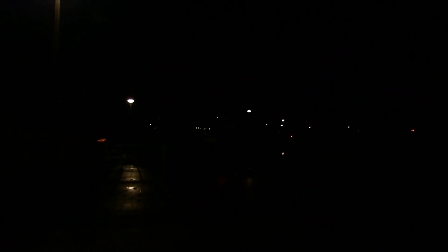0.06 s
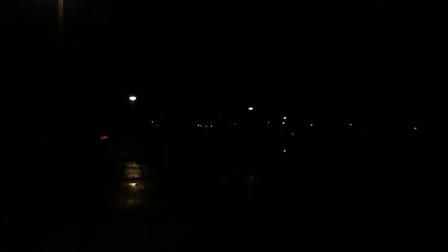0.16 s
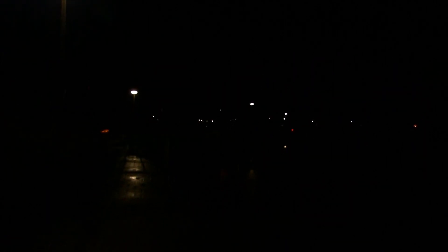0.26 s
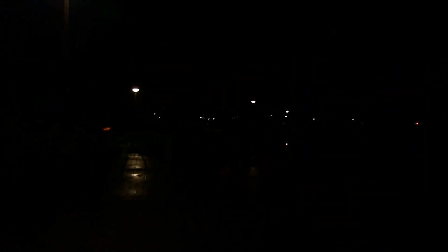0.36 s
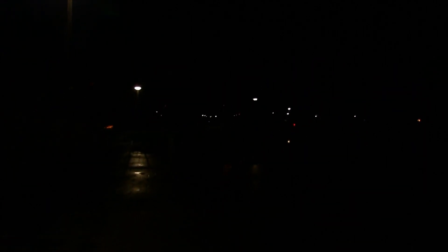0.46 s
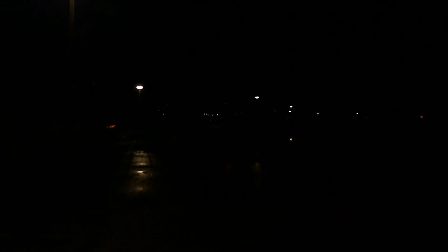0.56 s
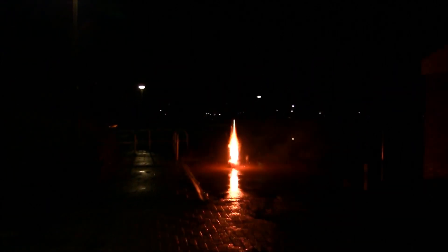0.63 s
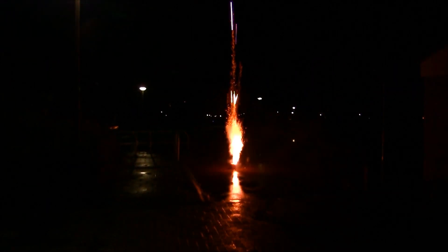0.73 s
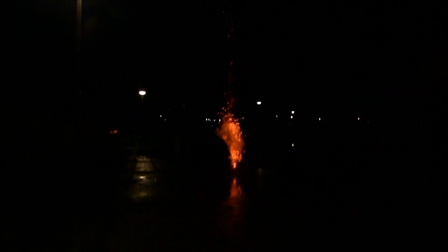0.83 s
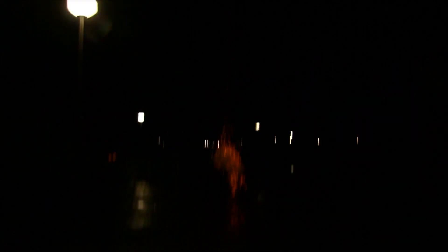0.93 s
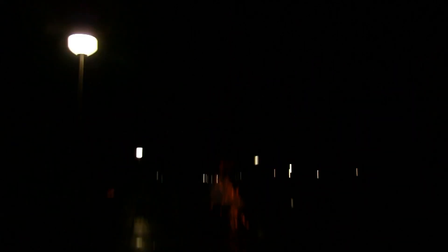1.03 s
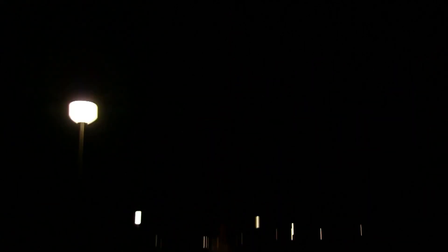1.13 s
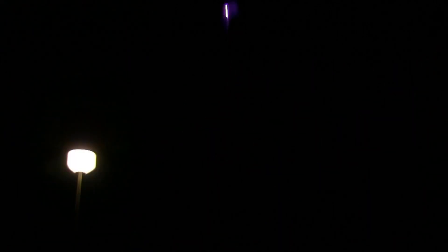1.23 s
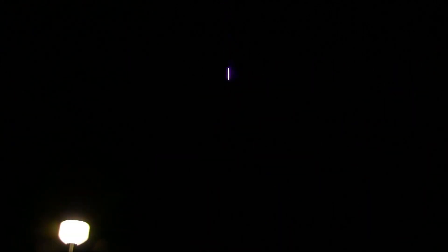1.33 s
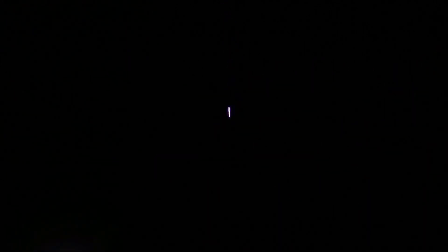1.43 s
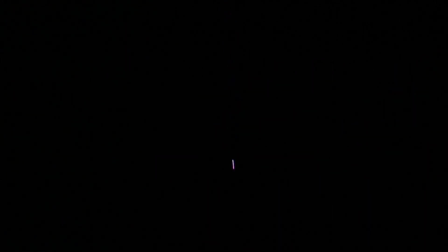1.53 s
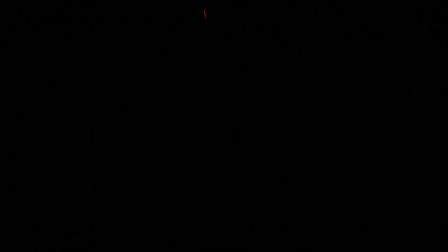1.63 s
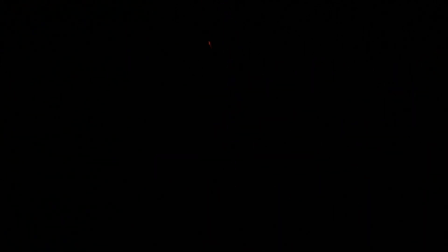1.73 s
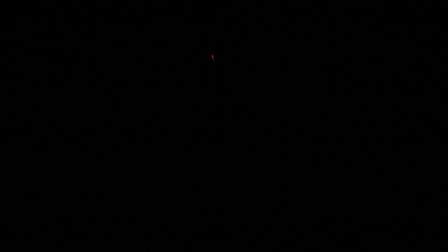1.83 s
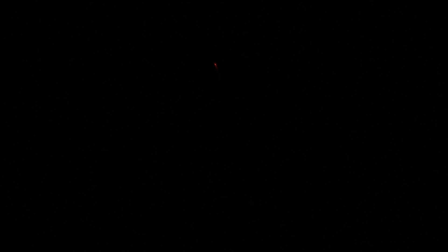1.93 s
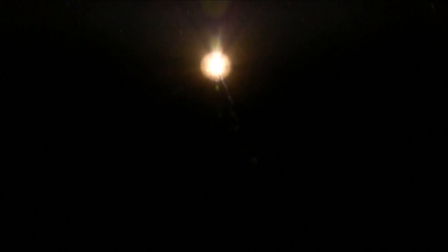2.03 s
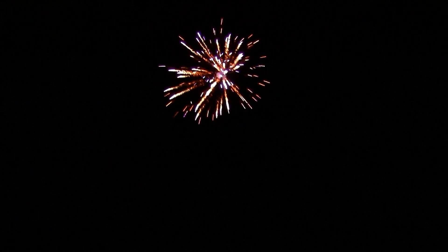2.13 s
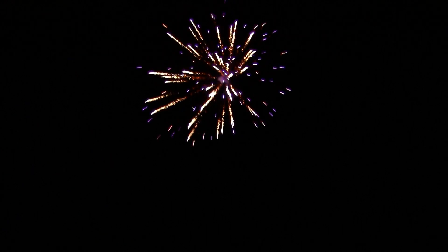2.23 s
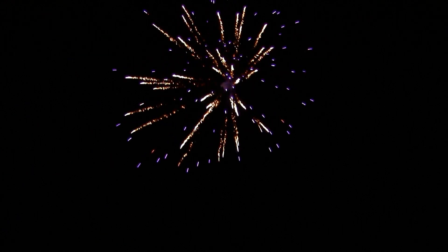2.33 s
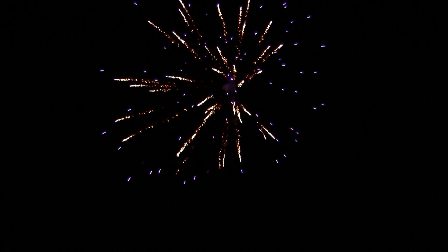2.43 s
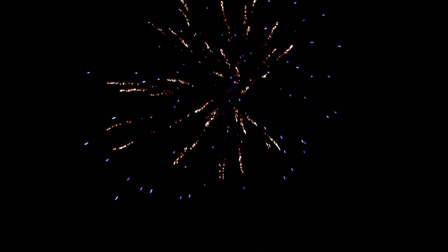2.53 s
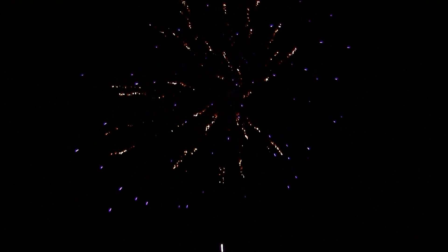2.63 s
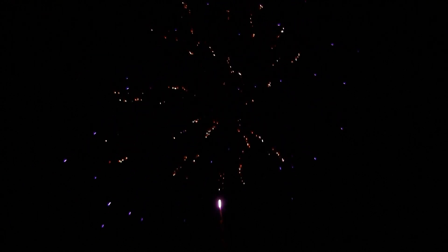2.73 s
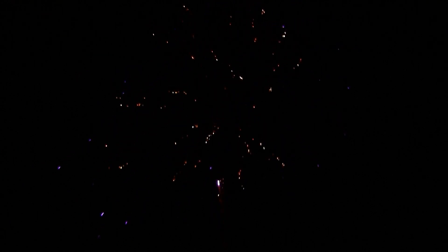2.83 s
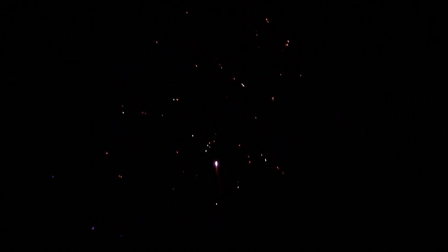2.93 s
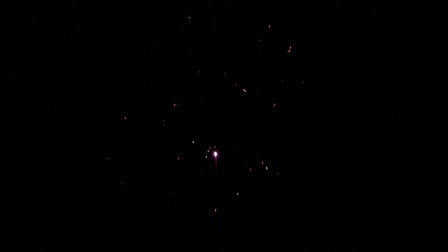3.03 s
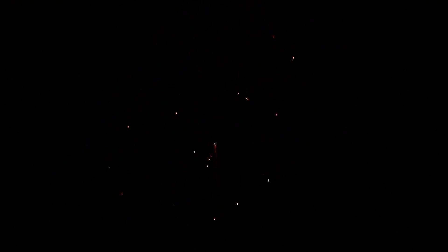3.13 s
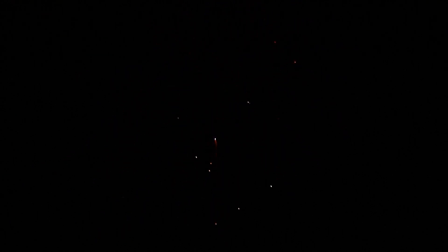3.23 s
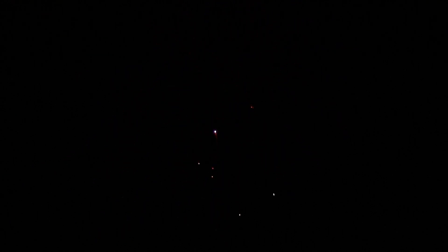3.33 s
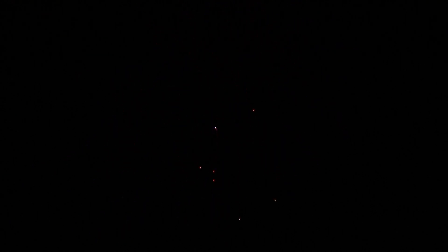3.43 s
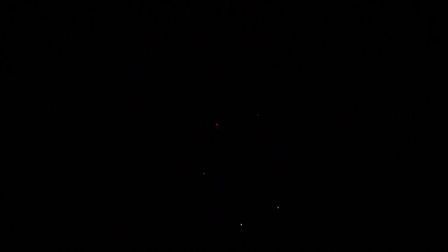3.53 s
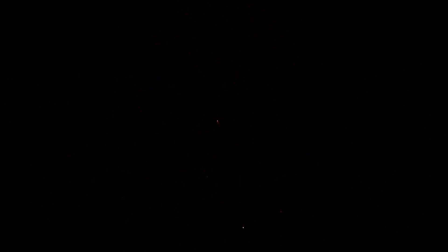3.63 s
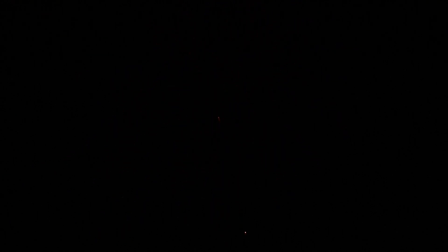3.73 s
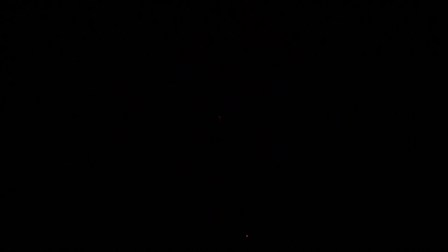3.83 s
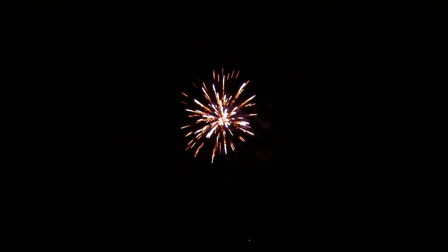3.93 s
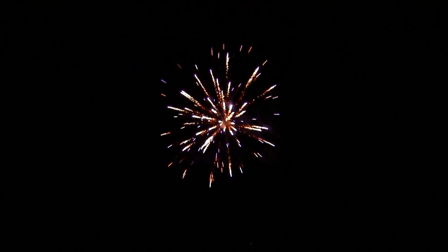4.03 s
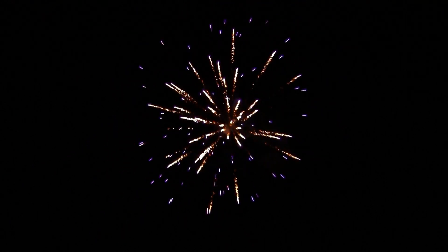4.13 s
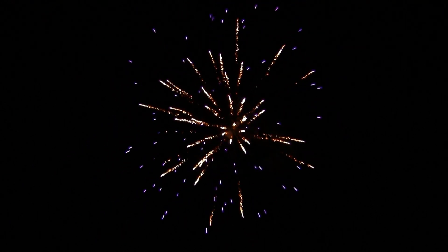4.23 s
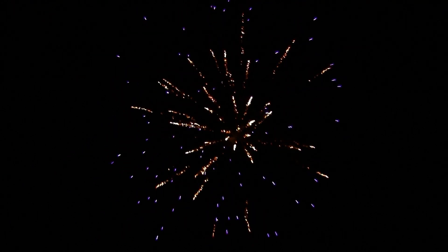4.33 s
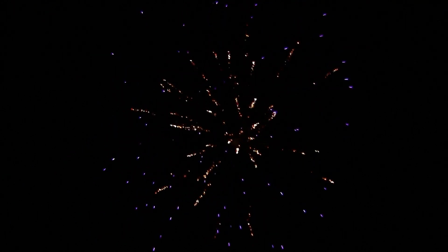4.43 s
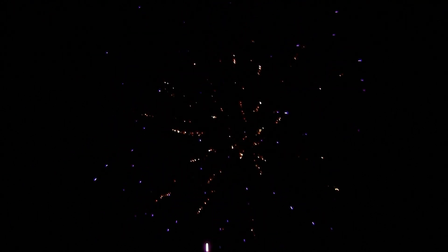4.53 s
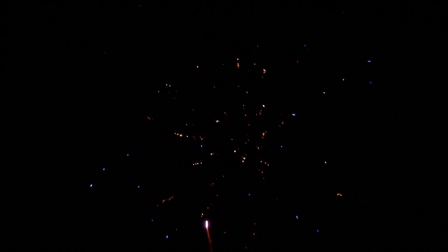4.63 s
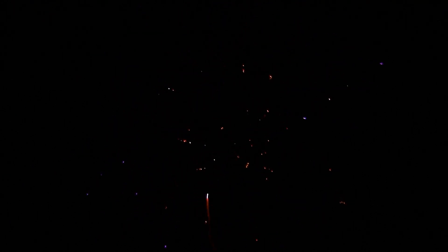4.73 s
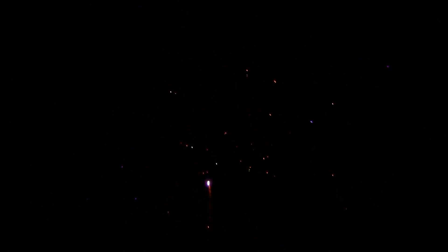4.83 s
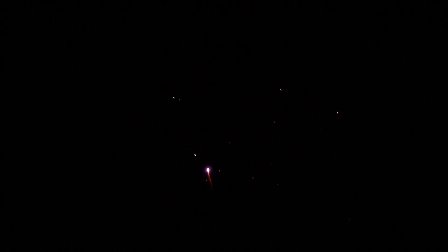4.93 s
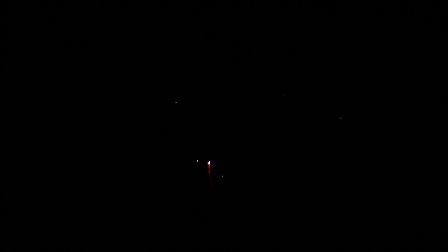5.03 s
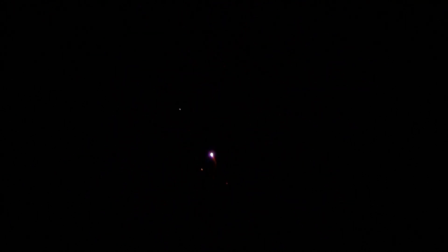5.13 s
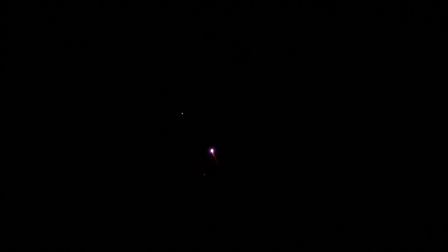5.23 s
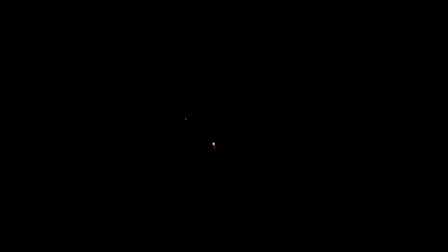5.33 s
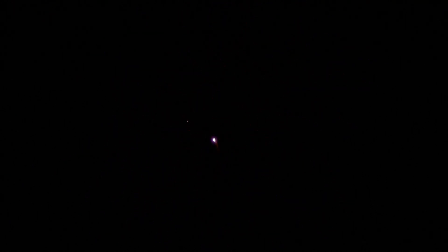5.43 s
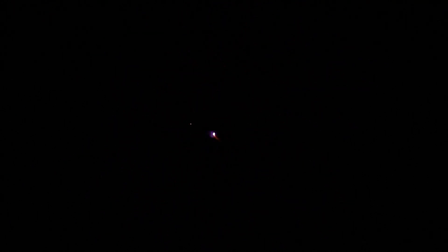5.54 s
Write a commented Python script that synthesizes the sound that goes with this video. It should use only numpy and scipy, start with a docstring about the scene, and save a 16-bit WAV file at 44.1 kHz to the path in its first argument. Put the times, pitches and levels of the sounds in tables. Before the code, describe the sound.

Outdoor night fireworks: a sharp launch bang with rushing climb, then two overloaded explosions about two seconds apart with hard echoes and long fading rumble.

```python
"""Firework cake over a paved yard

A lift charge fires and two shells burst overhead at night: shock pulses loud enough to overload the microphone.
Both slap back from walls as thinned pulses; the bursts also chirp off ribs as falling tones.
Rolls of grainy noise flare, hold and fade over the town, duller the longer they have travelled.
Both bursts meet the same houses, so their rolls swell and thud after the same delays.
Dull knocks and thuds sound far off, some of them late echoes of the second burst off distant buildings.
Sparks snap in short noise, and slow pressure swings nudge the microphone."""
import sys
import numpy as np
from scipy import signal
from scipy.fft import rfft, irfft
from scipy.io import wavfile
from scipy.ndimage import uniform_filter1d

SR = 44100
rng = np.random.default_rng(int(sys.argv[2]) if len(sys.argv) > 2 else 0)


def transcribe(signal):
    """Save signal, clipped to [-1, 1], as a 16-bit WAV file at the path in sys.argv[1]."""
    frames = np.atleast_2d(signal).T
    limited = np.clip(frames, -1, 1)
    pcm = np.round(limited * 32767).astype(np.int16)
    wavfile.write(sys.argv[1], SR, pcm)


N = 245637

# Pulse levels are set before filtering, spray levels at the onset; colours are relative levels.
# shell bursts: [t/s, crack level/dB, thump level/dB]
BURSTS = [(2.2084, 12, 0), (4.0459, 10, -1.5)]
# gas puffs leaving the tube: [t/s, pulse level/dB, pulse length/ms, spray level/dB]
LIFT_PUFFS = [(0.7171, -30, 0.26, -20), (0.7216, 4, 0.42, -14.5), (0.7269, -7, 2.5, -10.5),
              (0.732, -13, 0.62, -16), (0.7357, -1, 1.25, -7)]
# slaps off nearby walls: [t/s, level/dB, pulse length/ms, top f/Hz]
WALL_SLAPS = [(0.784, -1.5, 0.22, 4000), (.8210, -5, 0.92, 3000), (0.9343, 2, 0.13, 3500),
              (0.9613, -6, 0.16, 3000), (0.972, -0.5, 0.44, 3580), (2.2203, -6, 0.26, 9000),
              (2.3747, 2, 0.8, 6040), (2.3801, 2.5, 0.25, 6000), (2.3847, -0.5, 0.43, 6000),
              (2.6075, -1, .4, 3500), (2.6155, -3, .4, 4000), (4.063, -11, 0.34, 9000),
              (4.1675, 1.5, 0.7, 6000), (4.1730, -4, 0.55, 6000), (4.1775, -4.5, 0.46, 6030),
              (4.3205, -2, 0.66, 3000), (4.4085, -3.5, 0.41, 5770)]
# dull far knocks and thuds, some of them late echoes of the second burst off distant buildings:
# [t/s, pulse level/dB, pulse length/ms, top f/Hz, spray level/dB, knock level/dB]
FAR_KNOCKS = [(.4975, -22, .3, 2200, -21, -28), (.4995, -7.5, 1.6, 550, -14, -25),
              (2.1104, -14, .3, 2900, -19, -20), (2.1130, -18, .3, 2400, -21, -21),
              (2.1530, -11, .5, 1300, -23, -29), (3.8320, -26, 1.2, 450, -29, -43),
              (3.8620, -23, .3, 1500, -31, -36), (4.9945, -14, .6, 1500, -23, -29),
              (5.3185, -31, .2, 2500, -31, -36), (5.4530, -16, 1.4, 600, -25, -37)]
# sparks snapping: [t/s, level/dB]
SPARKS = [(1.1994, -52), (1.267, -34.5), (1.2734, -46), (1.3786, -47), (1.651, -52)]
# shape of each roll: [bass level/dB, body level/dB, rush level/dB, boom level/dB, basic hold/s,
# fall per doubling of age/dB, air loss at 10 kHz/(dB/s), side gain of bass and body/dB]
ROLLS = [(-41, -32.5, -37.5, -68, 0.096, 3, 70, -37), (-29.5, -24.5, -32, -44, 0.38, 11, 38, -20),
         (-61, -37.5, -43.5, -61, 0.11, 4, 62, -5), (-29, -22.5, -27, -36.3, 0.61, 10.5, 53, -7.5),
         (-30.7, -23, -27, -38.5, .55, 9, 54, 8.5)]
# where bass meets body and body meets rush: [f/Hz]
ROLL_SPLITS_HZ = (300, 1700)
# colour of the rolls: [f/Hz, level per Hz/dB]
ROLL_COLOUR = [(60, -8), (90, -5.5), (125, -1.5), (200, 1), (350, 1.5), (550, .5), (950, -8.5),
               (1500, -8.5), (2600, -16), (3500, -11), (4600, -22.5), (7000, -24), (11000, -28.5),
               (16000, -38)]
# width of the open-air noise: [f/Hz, side minus mid level/dB]
WIDTH = [(100, -64), (300, -43.5), (700, -26), (1400, -17), (2000, -17.5), (2800, -16), (4000, -9.5),
         (6000, -2.5), (11000, -6.5)]
# colour of the town hum: [f/Hz, level per Hz/dB]
TOWN_COLOUR = [(41, -30), (70, -6.5), (78, 0), (92, -10), (129, -9.5), (385, -18), (934, -29),
               (2540, -36.5), (4190, -45), (7910, -54), (9270, -52.5), (14900, -61), (16000, -63)]
TOWN_DB = -44  # before the stereo width is set
# colour of the wind buffets: [f/Hz, level per Hz/dB]
WIND_COLOUR = [(15, -20), (22, 9.5), (30, -14), (42, -4), (70, -26.5), (120, -23)]
CUTOFF_HZ = 16200
# ringing modes of the hollow far knock: [f/Hz, level/dB, t60/s]
KNOCK_MODES = [(480, -4, 0.028), (800, -1, 0.027), (1170, -9, 0.036), (1706, -3, 0.082), (2390, -30, 0.017),
               (3550, -19, 0.066)]
# chirps off ribbed surfaces: [t/s, length/s, start f/Hz, end f/Hz, level/dB]
CHIRPS = [(2.244, .014, 3480, 3380, -23.5), (2.249, .036, 2230, 1740, -24), (2.259, .018, 4300, 3850, -31),
          (2.270, .026, 3670, 3300, -25.5), (4.084, .030, 3560, 3300, -31), (4.087, .028, 2200, 1920, -28),
          (4.088, .020, 4400, 3950, -30), (4.107, .044, 3680, 3110, -29)]
# faint hiss dying away: [t/s, level/dB]
HISS_LEVEL = [(0, -45.5), (.09, -40), (.17, -43.5), (.25, -49), (.45, -48), (.6, -67)]
# colour of the hiss: [f/Hz, level per Hz/dB]
HISS_COLOUR = [(62, -17), (180, 3), (450, 4.5), (750, -5), (1050, -4), (1500, -9), (2500, -10.5),
               (4000, -25), (7500, -26.5), (10000, -39), (16000, -37)]
# slow sway of air pressure: [t/s, level before the sway gain/dB]
SWAY_LEVEL = [(0.0, -34.5), (0.15, -17.5), (0.25, -24), (1.04, -33.5), (1.19, -17.5), (1.3, -30),
              (2.08, -21), (2.34, -35.5), (4.11, -28.5), (4.24, -44), (5.03, -28), (5.57, -36.5)]
# colour of the sway: [f/Hz, level per Hz/dB]
SWAY_COLOUR = [(6, -3), (10, 0), (14, -3), (19, -20), (30, -60)]
# far-off rustling crackle: [t/s, level/dB]
RUSTLE_LEVEL = [(5.29, -78), (5.32, -37), (5.36, -55), (5.40, -38.5), (5.43, -53), (5.47, -50), (5.52, -66)]
# whoosh of the climbing shell's burning tail: [t/s, level/dB]
WHOOSH_LEVEL = [(.71, -80), (.735, -22.5), (.80, -31.5), (1.0, -31), (1.08, -29.5), (1.25, -36),
                (1.45, -44.5), (1.7, -50.5), (1.95, -86)]
# bass, body, rush and boom of every roll: [hold ratio, opening flare/dB, flare decay/s, share of the swells]
REGISTERS = [(1.31, 11, .025, 0.67), (1.042, 4.5, 0.11, 0.92), (0.86, 4, 0.051, 0.41),
             (1.28, 22.5, 0.026, 0.25)]
# swells and lulls both bursts draw from the houses: [delay/s, half width/s, swell/dB, extra boom swell/dB]
SWELLS = [(.31, 0.034, 1.5, 4), (.49, 0.09, 1.5, 3.5), (.63, .035, -3, 1), (0.777, 0.023, 4, 3),
          (.83, .06, 1.5, 12.5), (1.365, 0.024, -1, -2), (1.42, 0.022, 4.5, 10)]
# brief dips of the roll: [t/s, half width/s, depth/dB]
DIPS = [(.772, 0.013, 5.5), (1.0, 0.017, 4), (2.412, 0.046, 2.5), (4.15, 0.011, 3.5), (4.206, 0.021, 5)]
# dull thuds off distant walls: [delay/s, pulse level/dB, pulse length/ms, top f/Hz, spray level/dB]
FAR_WALLS = [(.680, -7.5, 1.0, 1300, -16.5), (.7644, -18, 2.0, 400, -23), (.783, -13, 2.4, 350, -18.5)]
BREEZE_DB, BREEZE_FOLLOWS = -39.5, 0.34  # buffeting at the mean sway; share of the sway's swing
# gusts on the microphone: [t/s, half width/s, level/dB]
GUSTS = [(.67, .045, -32), (.955, 0.023, -20.5), (1.11, .025, -30), (1.285, 0.074, -22),
         (1.47, 0.041, -25.5), (1.69, 0.16, -29), (2.18, 0.022, -28), (2.85, .1, -41), (3.06, .025, -38),
         (3.77, 0.071, -30), (4.72, 0.11, -49), (5.03, 0.029, -17.5), (5.12, 0.082, -31),
         (5.38, 0.046, -27)]
GROUND_LOSS_DB_PER_S = 4.5  # extra fading once the hold is over
# onset of each roll: [t/s, time its first sound has already spent in the air/s]
ROLL_STARTS = [(0.5, 2.3), (0.722, .05), (2.113, 1.5), (2.219, 0), (4.056, .004)]


def from_db(db):
    """Decibels to gain."""
    return 10 ** (np.asarray(db) / 20)


def rms_one(x):
    """Scales to rms 1."""
    return x / np.sqrt(np.mean(x ** 2) + 1e-20)


def in_time(rows):
    """Draws each column of a curve at every sample."""
    s, *columns = np.transpose(rows)
    return [np.interp(np.arange(N) / SR, s, column) for column in columns]


def at_hz(points, hz):
    """Reads a spectrum on a log-frequency axis."""
    point_hz, values = np.transpose(points)
    return np.interp(np.log(hz), np.log(point_hz), values)


def filtered(x, kind, hz, order=2):
    """Causal Butterworth filter."""
    sos = signal.butter(order, np.clip(hz, 5, .45 * SR), kind, fs=SR, output="sos")
    return signal.sosfilt(sos, x)


def drift(rate):
    """Smooth random wander of spread 1, with rate new targets a second."""
    knots = rng.standard_normal(N // 8)
    return np.interp(np.arange(N) * rate / SR, np.arange(len(knots)), knots) * np.sqrt(3 / 2)


def eased(control):
    """Rounds the steps of a control over a few milliseconds."""
    return uniform_filter1d(uniform_filter1d(control, size=SR // 300), size=SR // 400)


def hump(s, half_width):
    """A smooth rise and fall of height 1 around time s."""
    return np.exp(-np.minimum(((np.arange(N) / SR - s) / half_width) ** 2, 50))


def add(out, s, sound):
    """Mixes a short sound in at time s."""
    at = int(round(s * SR))
    out[:, at:at + sound.shape[-1]] += sound[..., :N - at]


def spread(pair, side_db):
    """Treats a pair as mid and side, sets the side gain and decodes to left and right."""
    mid, side = pair
    return mid + from_db(side_db) * side * np.array([[1], [-1]])


def narrowed(x, side_db):
    """Scales what differs between left and right."""
    left, right = x
    return spread([(left + right) / 2, (left - right) / 2], side_db)


def noise_bands(colour, grain=1, low_hz=62, count=20):
    """Yields (Hz, stereo noise) for each band up to the cut-off; all bands share the grain."""
    white = rng.standard_normal((2, 2, N)) * grain
    edges = np.geomspace(low_hz, CUTOFF_HZ, count + 1)
    for k, (low, high) in enumerate(zip(edges, edges[1:])):
        hz = np.sqrt(low * high)
        pair = filtered(white[k % 2], "band", [low, high])  # neighbouring bands use different noise
        yield hz, from_db(at_hz(colour, hz)) * spread(pair, at_hz(WIDTH, hz))


def noise_grain(per_s=260, decay_s=.0025, size_db=3.2, wash=1.4):
    """Grains stand out of an even wash: each jumps up at once and dies in milliseconds."""
    sizes = from_db(size_db * np.minimum(rng.exponential(1, N), 3))
    arrivals = (rng.random(N) < per_s / SR) * sizes
    power = signal.lfilter([1], [1, -np.exp(-1 / (decay_s * SR))], arrivals ** 2 + 1e-18)
    power = wash + power / np.mean(power)
    return np.sqrt(power / uniform_filter1d(power, size=SR // 25))  # evens out the longer-term level


def moment():
    """Time axis of one short event."""
    return np.arange(SR // 6) / SR


def shock(length_ms):
    """Blast wave: an instant rise, a fall through zero after length_ms, then suction."""
    phase = moment() * 1000 / length_ms
    return (1 - phase) * np.exp(-phase)


def spray(t60, low_hz, top_hz, side_db):
    """A short shower of scattered sound: filtered noise that dies away by 60 dB in t60 seconds."""
    t = moment()
    noise = filtered(rng.standard_normal((2, len(t))), "high", low_hz)
    noise = filtered(noise, "low", top_hz)
    return spread(rms_one(noise), side_db) * from_db(-60 * t / t60)


def glide(length, start_hz, end_hz, rough):
    """A short tone that falls quickly, then more slowly, wavering in pitch and strength."""
    along = np.linspace(0, 1, int(length * SR))
    waver, flicker = drift(1490)[:len(along)], drift(363)[:len(along)]
    path_hz = start_hz * (end_hz / start_hz) ** along ** .8
    hz = path_hz * (1 + rough * waver)
    swell = np.sqrt(np.abs(np.sin(np.pi * along))) * from_db(100 * rough * flicker)
    return swell * np.sin(2 * np.pi * np.cumsum(hz) / SR)


def town():
    """Steady far-off noise and a hiss that dies away, both coloured band by band; only their treble is wide."""
    grain = from_db(0.47 * drift(60))
    hum = from_db(TOWN_DB) * rms_one(sum(band for _, band in noise_bands(TOWN_COLOUR, grain)))
    hiss_level, = in_time(HISS_LEVEL)
    hiss = from_db(hiss_level) * rms_one(sum(band for _, band in noise_bands(HISS_COLOUR)))
    left, right = hum + hiss
    side = filtered((left - right) / 2, "high", 7200)
    return spread([(left + right) / 2, side], 0.37)


def lumps(colour, level_db):
    """Slow swings of pressure: noise from 5 to 130 Hz that follows a level."""
    hz = np.arange(N // 2 + 1) * SR / N + 1e-3
    spectrum = rfft(rng.standard_normal(N)) * from_db(at_hz(colour, hz))
    swings = rms_one(irfft(spectrum * (hz > 5) * (hz < 130), N))
    evened = swings / np.sqrt(uniform_filter1d(swings ** 2, size=SR // 8) + 0.012)
    return from_db(level_db) * evened


def wind(sway_gain_db=4.0):
    """A breeze and its gusts buffet the microphone, nearly alike on both sides, over a slow sway."""
    sway_db, = in_time(SWAY_LEVEL)
    breeze = from_db(BREEZE_DB + BREEZE_FOLLOWS * (sway_db - sway_db.mean()))
    gusts = sum(from_db(level_db) * hump(s, half_width) for s, half_width, level_db in GUSTS)
    force_db = 20 * np.log10(np.hypot(breeze, gusts))
    buffets = spread([lumps(WIND_COLOUR, force_db), lumps(WIND_COLOUR, force_db)], side_db=-36)
    return buffets + lumps(SWAY_COLOUR, sway_db + sway_gain_db)


def knock():
    """A hollow knock: a few modes ring briefly, alternating in sign."""
    t = moment()
    ring = np.zeros(len(t))
    for k, (hz, level_db, t60) in enumerate(KNOCK_MODES):
        ring += from_db(level_db - 60 * t / t60) * np.sin(2 * np.pi * hz * t) * (-1) ** k
    return ring


def thud(level_db, length_ms, top_hz, spray_db):
    """Distance rounds a shock and trails reflections after it."""
    trail = from_db(spray_db) * spray(t60=0.026, low_hz=top_hz / 4, top_hz=top_hz, side_db=-29)
    return from_db(level_db) * filtered(shock(length_ms), "low", top_hz) + trail


def far_knocks():
    """Dull far knocks and thuds, some of them echoes of the bursts off distant walls; all lose their treble."""
    out = np.zeros((2, N))
    for s, *shape, knock_db in FAR_KNOCKS:
        add(out, s, thud(*shape) + from_db(knock_db) * knock())
    for s, _, _ in BURSTS:
        for delay, *shape in FAR_WALLS:
            add(out, s + delay, thud(*shape))
    return filtered(out + 1e-18, "low", 3550, order=6)


def boom(low_hz=110, high_hz=142):
    """The buildings hold one low note: narrow-band noise with its level evened to about rms 1."""
    note = filtered(rng.standard_normal(N), "band", [low_hz, high_hz])
    return note / np.sqrt(uniform_filter1d(note ** 2, size=SR // 12) + 1e-9)


def roll_levels(latest, age, lumpy_db=1.12):
    """dB of bass, body, rush and boom: each flares, holds, then falls as echoes come from ever farther away."""
    *levels, hold, fall_db, _, _ = np.transpose(ROLLS)
    swell, boom_swell = np.zeros((2, N))
    for delay, half_width, swell_db, boom_db in SWELLS:
        passing = sum(hump(s + delay, half_width) for s, _, _ in BURSTS)
        swell = swell + swell_db * passing
        boom_swell = boom_swell + boom_db * passing
    dips = sum(depth_db * hump(s, half_width) for s, half_width, depth_db in DIPS)
    shared = lumpy_db * drift(24.76) - dips
    out = []
    for level_db, (hold_ratio, flare_db, flare_s, share) in zip(levels, REGISTERS):
        held = hold_ratio * hold[latest]
        past = np.maximum(age - held, 0)
        fallen_db = fall_db[latest] * np.log2(1 + past / held) + GROUND_LOSS_DB_PER_S * past
        flare = flare_db * np.exp(-age / flare_s)
        out.append(level_db[latest] + flare - fallen_db + share * swell + shared)
    out[-1] = out[-1] + boom_swell
    return eased(np.array(out))


def rolls(patchy_db=0.72):
    """Countless echoes from the town; late ones have come farther and lost their treble to the air."""
    t = np.arange(N) / SR
    starts, flown = np.transpose(ROLL_STARTS)
    *_, air_db_per_s, side_db = np.transpose(ROLLS)
    latest = np.maximum(np.searchsorted(starts, t) - 1, 0)  # the newest roll takes over
    age = np.maximum(t - starts[latest], 0)
    loss_db = eased(air_db_per_s[latest] * (age + flown[latest]))
    *levels, boom_db = roll_levels(latest, age)
    registers, power = np.zeros((3, 2, N)), np.zeros(3)
    for hz, band in noise_bands(ROLL_COLOUR, noise_grain(), count=26):
        k = np.searchsorted(ROLL_SPLITS_HZ, hz)
        air_db = -loss_db * (max(hz - 3000, 0) / 7000) ** 1.05
        registers[k] += band * from_db(air_db + patchy_db * drift(45))
        power[k] += np.mean(band ** 2)  # before the air takes its share
    bass, body, rush = (x / np.sqrt(p) * from_db(db) for x, p, db in zip(registers, power, levels))
    lower = narrowed(bass + body, side_db[latest]) + from_db(boom_db) * boom()
    upper = rush * from_db([[-.9], [.9]])  # leans a little to the right
    return (lower + upper) * eased(1. * (t > starts[0]))


def whoosh(level, low_hz, high_hz):
    """A grainy band of rushing noise that follows a level curve."""
    pair = filtered(rng.standard_normal((2, N)) * noise_grain(), "band", [low_hz, high_hz], order=3)
    level_db, = in_time(level)
    return from_db(level_db) * spread(rms_one(pair), side_db=-47)


def lift():
    """The shell leaves the tube with a zip and a ragged string of puffs, each with a spit of hot gas."""
    out = np.zeros((2, N))
    zip_tone = from_db(-12) * glide(.005, 2800, 1700, rough=.02)
    add(out, LIFT_PUFFS[0][0], zip_tone)
    for s, level_db, length_ms, spray_db in LIFT_PUFFS:
        add(out, s, from_db(level_db) * filtered(shock(length_ms), "low", 4000))
        add(out, s, from_db(spray_db) * spray(t60=0.014, low_hz=1100, top_hz=2100, side_db=-19))
        add(out, s, from_db(spray_db - 20.5) * spray(t60=0.099, low_hz=4000, top_hz=11400, side_db=-7))
    return out


def slaps():
    """Walls return the report thinned and dulled, with a short clatter and a brighter spatter."""
    out = np.zeros((2, N))
    for s, level_db, length_ms, top_hz in WALL_SLAPS:
        wave = -filtered(filtered(shock(length_ms), "high", 306), "low", top_hz)
        clatter = from_db(-25) * spray(t60=0.069, low_hz=450, top_hz=1260, side_db=-25)
        spatter = from_db(-37.5) * spray(t60=0.029, low_hz=1500, top_hz=top_hz, side_db=3)
        add(out, s, from_db(level_db) * (wave + clatter + spatter))
    return out


def sparks():
    """Burning grains snap with a thin, bright tick of noise."""
    out = np.zeros((2, N))
    for s, level_db in SPARKS:
        add(out, s, from_db(level_db) * spray(t60=0.021, low_hz=4970, top_hz=13000, side_db=-2))
    return out


def bursts(ground_s=0.00204, thump_ms=3.7):
    """The crack, its bounce off the ground, the slow push and suction of the gas, and scatter off the paving."""
    out = np.zeros((2, N))
    for s, crack_db, thump_db in BURSTS:
        crack = -from_db(crack_db) * filtered(shock(length_ms=0.49), "high", 464)
        thump = from_db(thump_db) * filtered(shock(length_ms=thump_ms), "low", 1050)
        gas_push = -from_db(-42) * filtered(shock(length_ms=47), "low", 90)
        scatter = from_db(-19) * spray(t60=.1, low_hz=200, top_hz=1400, side_db=-18)
        add(out, s, crack)
        add(out, s + ground_s, -from_db(-19) * crack)
        add(out, s + ground_s, thump)
        add(out, s + 0.0019, gas_push)
        add(out, s + ground_s, scatter)
    return out


def rib_chirps():
    """Even ribs echo in turn, ever more slowly: heard as a falling tone, rough where the ribs are uneven."""
    out = np.zeros((2, N))
    for s, length, start_hz, end_hz, level_db in CHIRPS:
        add(out, s, from_db(level_db) * glide(length, start_hz, end_hz, rough=.038))
    return out


def scene():
    """The cake, its echoes, dull knocks and rustling far off, and the night air."""
    cake = lift() + whoosh(WHOOSH_LEVEL, low_hz=1390, high_hz=3450) + bursts() + sparks()
    echoes = slaps() + rib_chirps() + rolls()
    far_off = far_knocks() + whoosh(RUSTLE_LEVEL, low_hz=1530, high_hz=2290)
    return cake + echoes + far_off + town() + wind()


def record(dry):
    """The microphone overloads: only peaks above the knee are flattened; then the top is cut."""
    knee, room = .42, .1  # linear amplitude; room is the most a peak can rise above the knee
    below = np.clip(dry, -knee, knee)
    flattened = below + room * np.tanh((dry - below) / room)
    top_cut = signal.ellip(10, .1, 80, CUTOFF_HZ, fs=SR, output="sos")
    return signal.sosfilt(top_cut, flattened)


dry = scene()
out = record(dry)
transcribe(out)
```